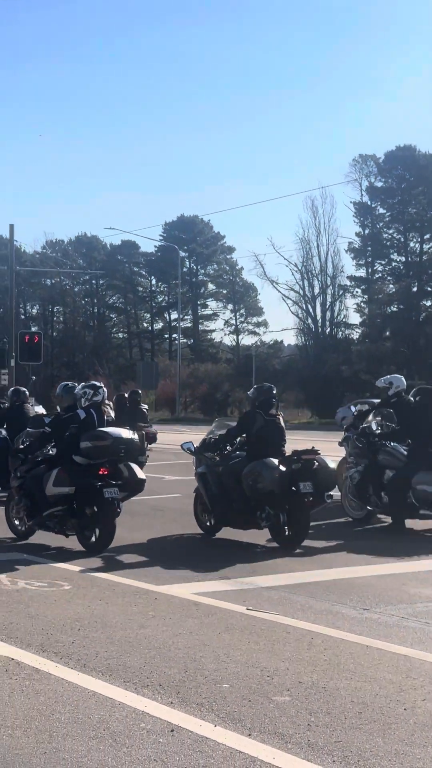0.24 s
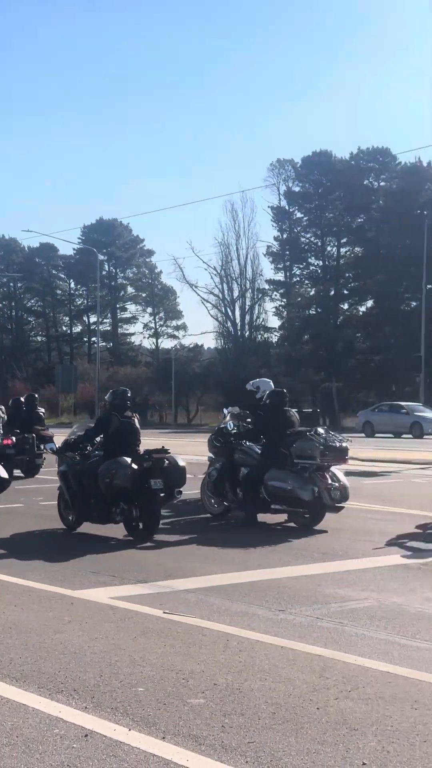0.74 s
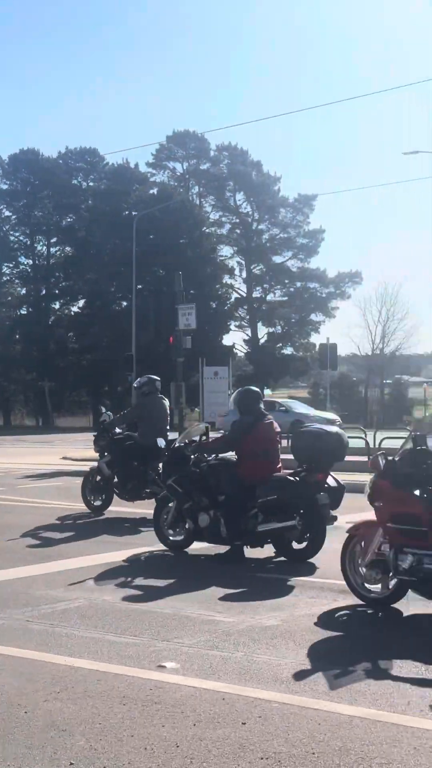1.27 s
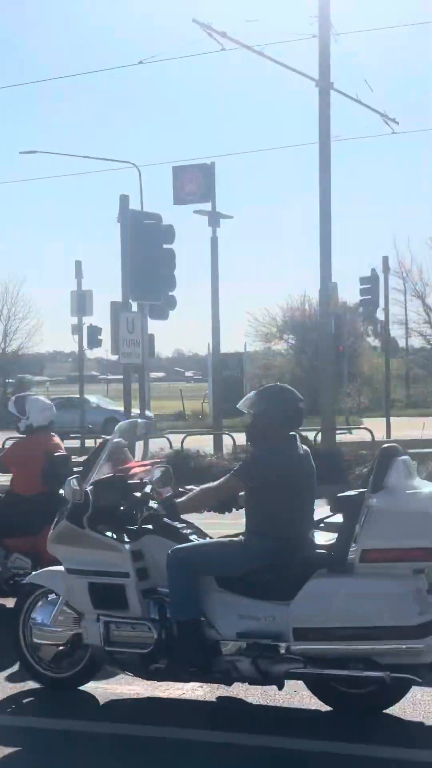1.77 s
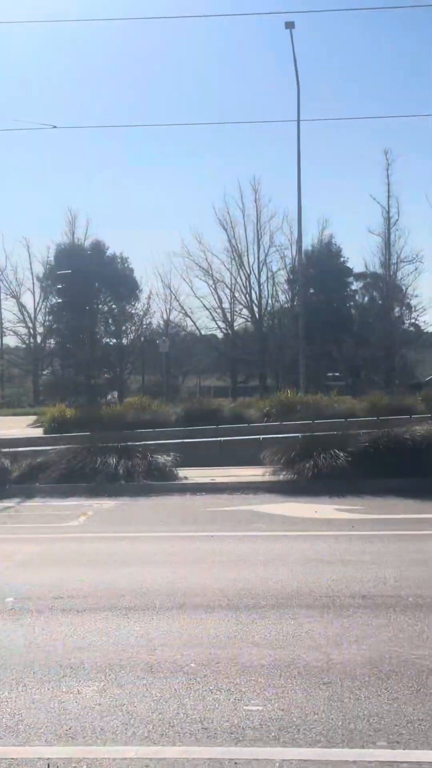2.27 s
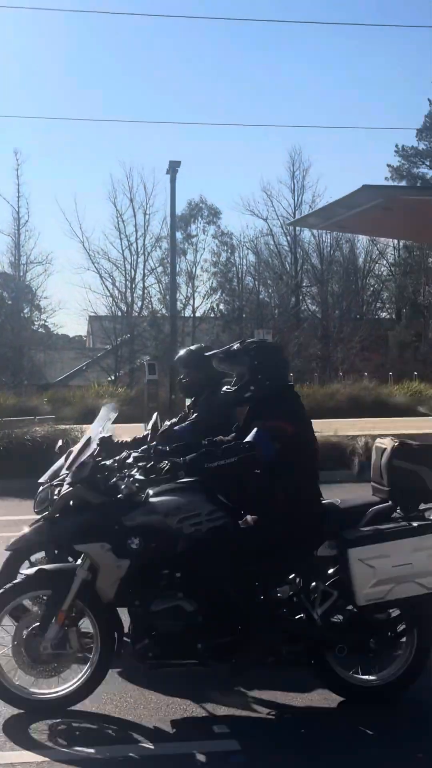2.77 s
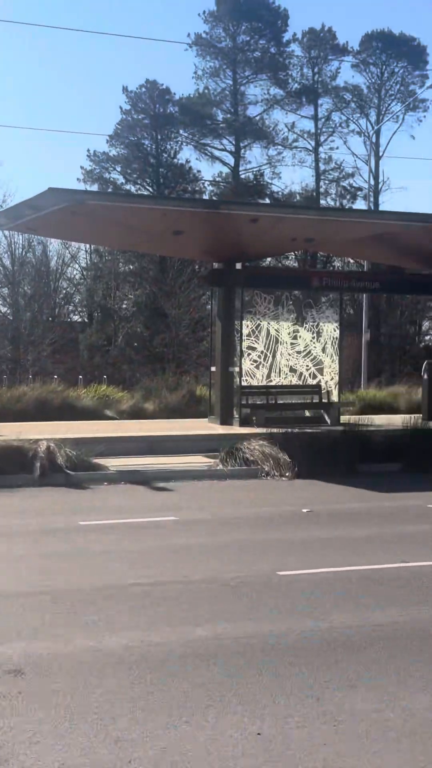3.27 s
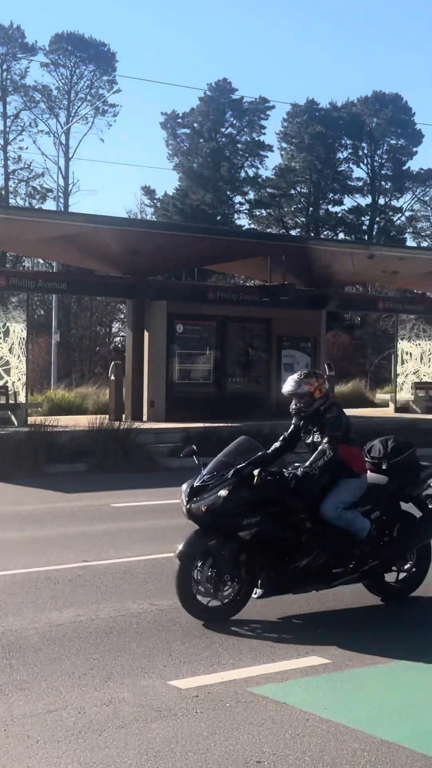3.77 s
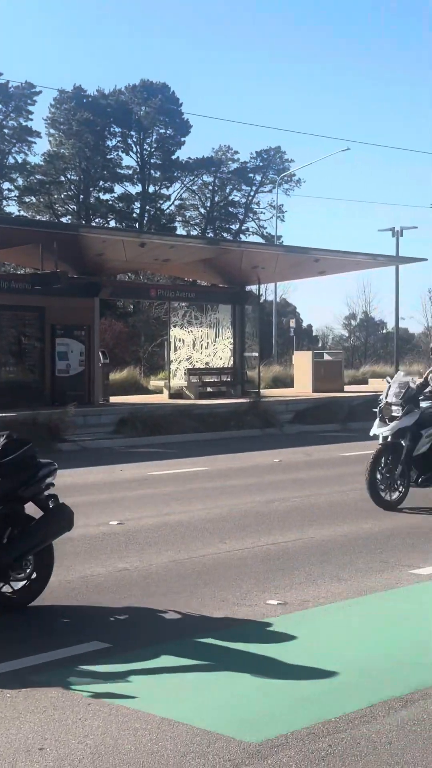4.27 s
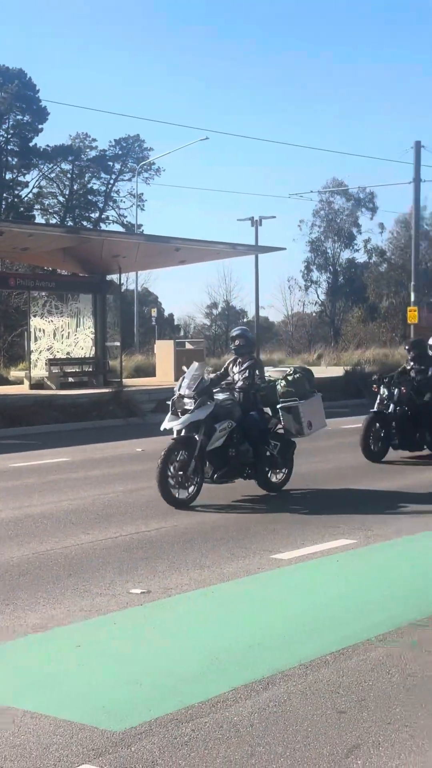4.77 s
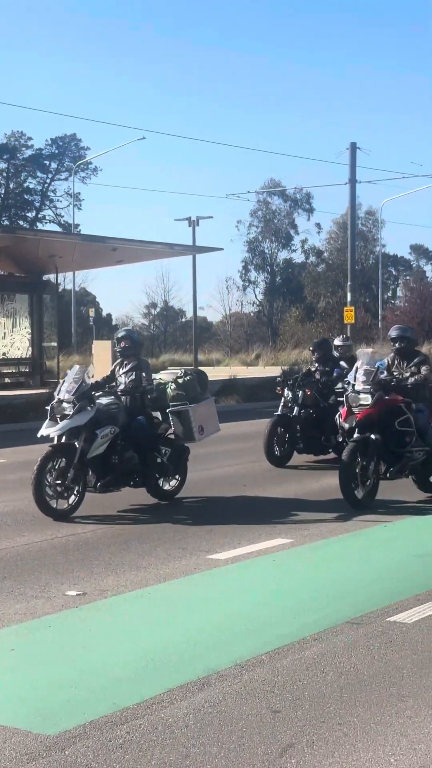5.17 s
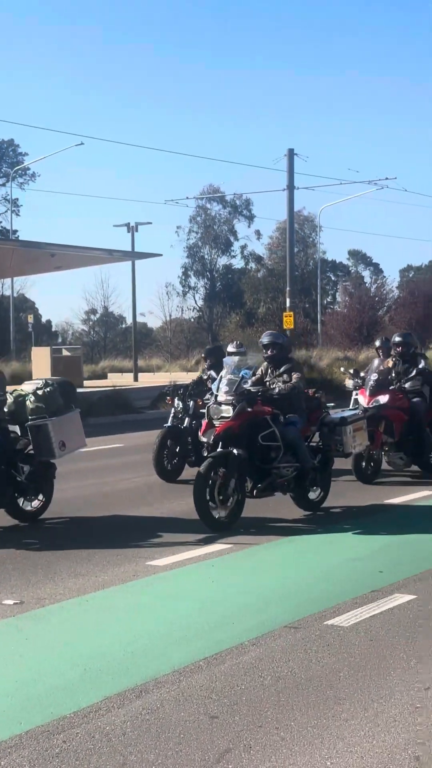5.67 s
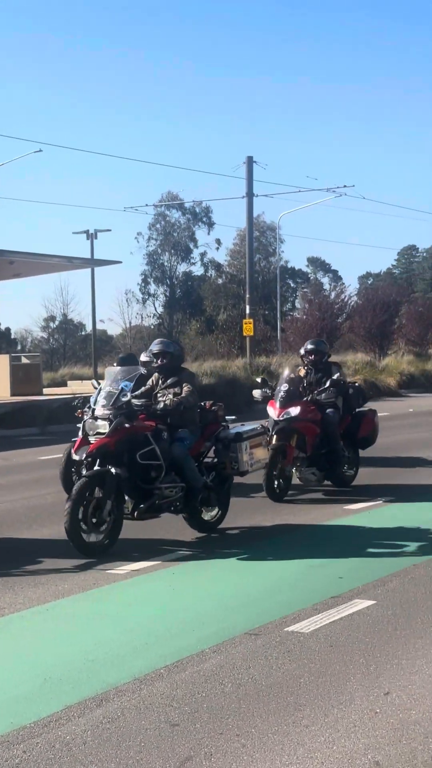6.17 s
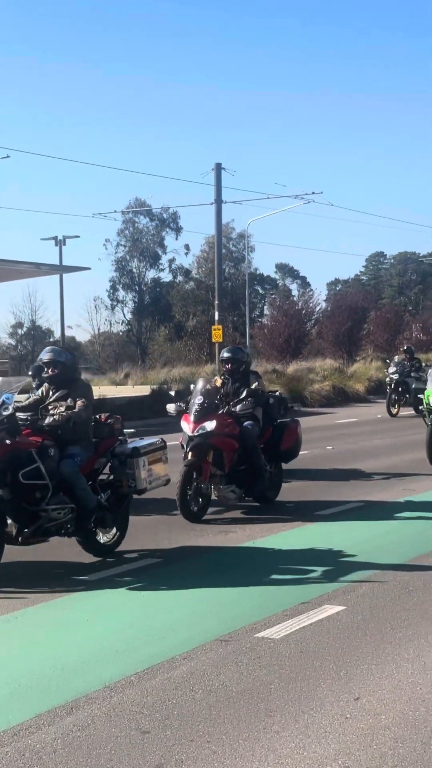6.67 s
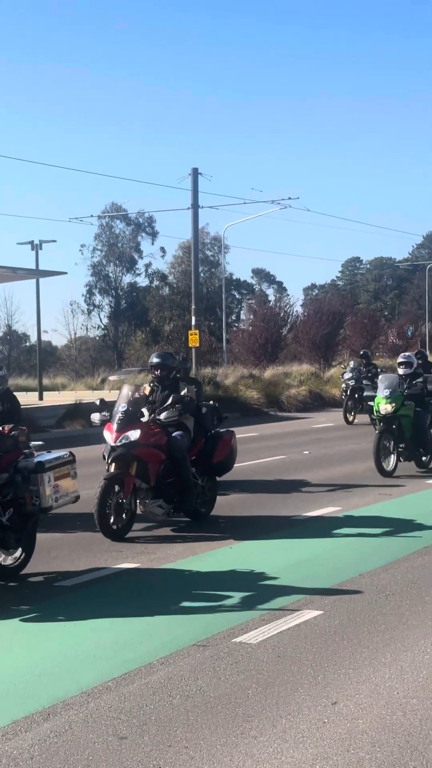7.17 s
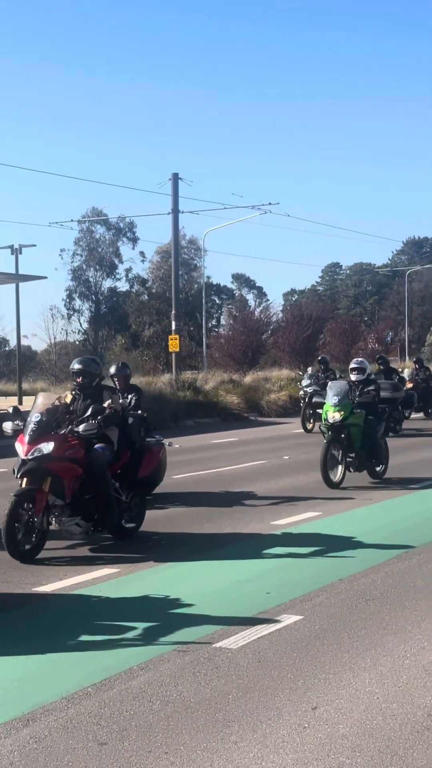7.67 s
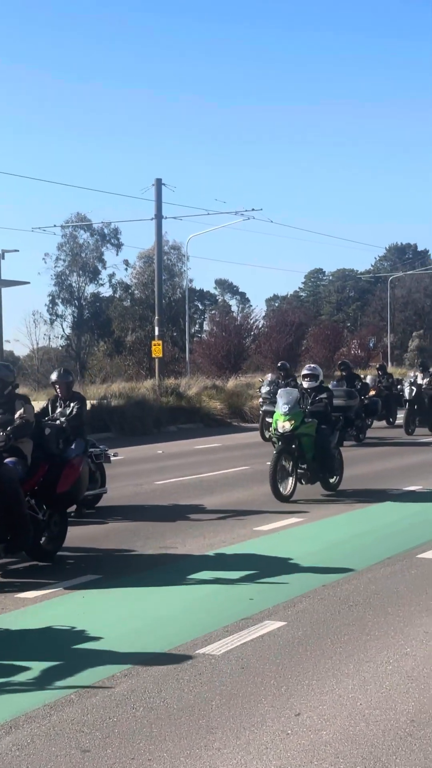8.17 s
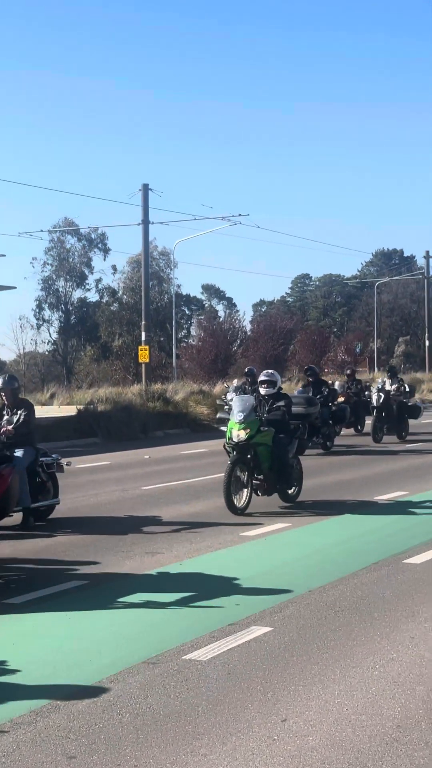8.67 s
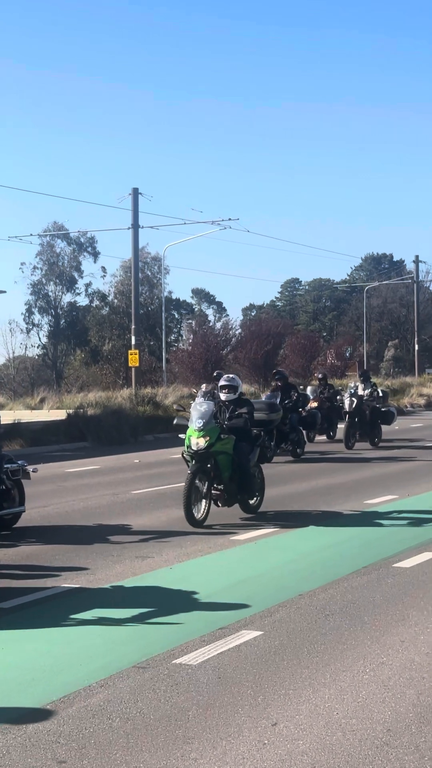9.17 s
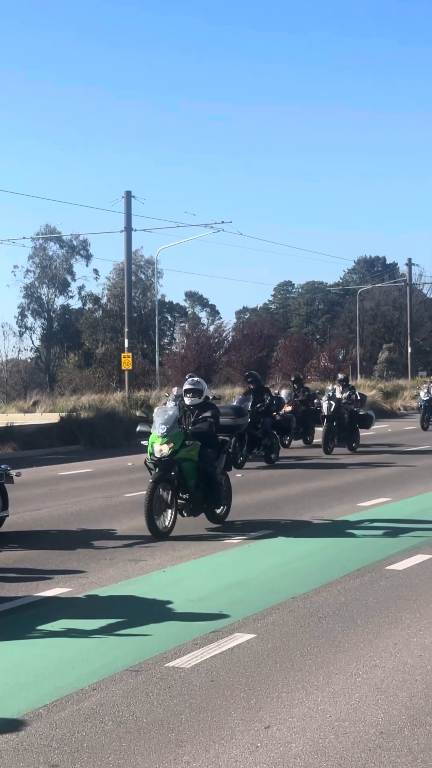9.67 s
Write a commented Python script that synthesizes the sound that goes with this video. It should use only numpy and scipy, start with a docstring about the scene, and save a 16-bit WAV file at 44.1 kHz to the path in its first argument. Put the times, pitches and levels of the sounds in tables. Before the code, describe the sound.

Close roadside sound of a motorcycle procession, already under way. Low engines overlap and waver, with irregular nearby thumps and soft road hiss. Rumbling wind hits the two-port microphone strongly in the first four seconds. Small squeaks and light mechanical ticking come and go; from about five seconds a single distinct engine thuds regularly and grows stronger, with a thin brake whine.

```python
"""At the kerb of a road, a long line of large motorcycles rolls slowly past a microphone with two ports.
Exhausts thump out of step over drifting sine drones; nearer firings are sines that fall in pitch as whoops.
Shaped noise makes tyre hiss, sizzle and a faint airy top; resonators tick for one engine's valve gear.
Brakes squeak and whine as gliding sines, and gusts of wind noise push the two ports opposite ways."""
import sys
import numpy as np
from scipy import signal
from scipy.fft import irfft
from scipy.io import wavfile
from scipy.ndimage import uniform_filter1d

SR = 44100
rng = np.random.default_rng(int(sys.argv[2]) if len(sys.argv) > 2 else 0)


def master(y):
    """Save y as 16-bit WAV."""
    cut = np.clip(np.atleast_2d(y).T, -1, 1)
    pcm = np.round(cut * 32767)  # scale
    wavfile.write(sys.argv[1], SR, pcm.astype(np.int16))


N = 437472  # samples


def gain_of(db):
    """Turns dB into a linear gain."""
    return 10 ** (np.asarray(db) / 20)


def evened(x):
    """Scales a signal to an rms of 1."""
    return x / np.sqrt(np.mean(abs(x) ** 2) + 1e-20)


def smoothed(grid, bins, frames):
    """Averages a spectrogram over neighbouring bins, then over neighbouring frames."""
    return uniform_filter1d(uniform_filter1d(grid, size=bins, axis=0), size=frames, axis=1)


def read(points, hz):
    """Columns of a spectrum table at the frequencies hz, straight lines over log frequency."""
    f, *columns = np.transpose(points)
    return [np.interp(np.log(hz + 1), np.log(f + 1), c) for c in columns]


def follow(rows, t):
    """Columns of a time curve at the times t."""
    s, *columns = np.transpose(rows)
    return [np.interp(t, s, c) for c in columns]


def wander(rate, t):
    """Slow random movement of rms 1: twenty sines of random phase from rate / 20 up to rate in Hz."""
    coarse = np.arange(0, t[-1] + .02, .01)
    turns = np.geomspace(rate / 20, rate, num=20)[:, None] * coarse + rng.random((20, 1))
    movement = evened(np.sin(2 * np.pi * turns).sum(0))
    return np.interp(t, coarse, movement)


def strokes(cycles):
    """One click wherever the count of cycles passes a whole number."""
    return np.diff(np.floor(cycles), prepend=np.floor(cycles[0]))


def patchy(points, level_db, patch_db):
    """Noise of one colour whose level varies in patches; level_db is one value, per frame or bins x frames."""
    hz = np.fft.rfftfreq(512, 1 / SR)
    real, imaginary, patches = rng.standard_normal((N // 128 + 5, 257, 3)).T
    patches = evened(smoothed(patches, 8, 16))
    colour = gain_of(read(points, hz)[0])[:, None]
    colour /= np.linalg.norm(colour)  # only the shape of the table counts
    z = (real + 1j * imaginary) * colour * gain_of(level_db + patch_db * patches)
    return signal.istft(z, nperseg=512, noverlap=384)[1][:N]


# Colour of the faint hiss at the very top. Each row: frequency in Hz, relative density in dB per Hz.
AIRY_COLOUR = [(13600, -41), (14600, -11.5), (15500, 1), (16000, -1.5)]
AIRY_SUM_DB, AIRY_APART_DB = -72.5, -64.5


def airy_top():
    """Very patchy high noise, one part alike at both ports and a stronger part opposite."""
    both, across = (patchy(AIRY_COLOUR, db, patch_db=7.0) for db in (AIRY_SUM_DB, AIRY_APART_DB))
    return np.array([both + across, both - across])


# Gusts at the ports. Each row: start in seconds, hold in seconds, strength in dB.
GUSTS = [(0.0, 1, -37), (0.9, 0.19, -33), (1.13, 0.31, -38), (1.976, .05, -30.5), (2.094, 0.36, -37),
         (2.65, .05, -39), (2.874, 0.18, -31), (3.279, 0.056, -34.5), (3.542, 0.025, -36.5),
         (3.95, .24, -42.5), (4.47, 0.033, -49), (5.07, 0.14, -41), (6.45, 0.033, -41), (7.99, 0.019, -48),
         (8.757, 0.24, -41.5), (9.133, 0.035, -39), (9.343, .02, -48), (9.52, 0.018, -42)]
# The breeze between gusts. Each row: time in seconds, strength in dB.
BREEZE = [(0.0, -45), (2.0, -42.5), (4.2, -48.5), (4.65, -80), (5.9, -58), (7.0, -61.5), (7.6, -80.5),
          (9.0, -59), (9.92, -67)]
GUST_RISE_DB_PER_S, GUST_FALL_DB_PER_S = 261, 222.5


def wind_db(t):
    """Strength of the wind: a breeze, and gusts that rise fast, hold and die away."""
    start, hold, db = np.transpose(GUSTS)[:, :, None]
    rise = GUST_RISE_DB_PER_S * np.maximum(start - t, 0)
    fall = GUST_FALL_DB_PER_S * np.maximum(t - start - hold, 0)
    return np.maximum((db - rise - fall).max(axis=0), follow(BREEZE, t)[0])


# Colour of the wind noise. Each row: frequency in Hz, density against the wind strength in dB per Hz.
WIND_COLOUR = [(18, -41.5), (30, -18), (96, 3.5), (223, 2.5), (427, -15), (612, -17), (1040, -27.5),
               (1320, -46), (1800, -48.5), (2340, -79), (3960, -120)]


def wind_noise(hz, gust_db):
    """Spectrogram of the low rumble of air on the ports: random bins that follow the gusts."""
    real, imaginary = rng.standard_normal((len(gust_db), len(hz), 2)).T
    return gain_of(read(WIND_COLOUR, hz)[0][:, None] + gust_db) * (real + 1j * imaginary)


# Colour of tyres on tarmac. Each row: frequency in Hz, relative density in dB per Hz.
TYRE_COLOUR = [(180, -32), (300, 2), (345, -3), (392, -8.5), (614, -9.5), (797, -12), (969, -8),
               (1150, -11), (1270, -27), (1400, -14.5), (1520, -14), (1830, -34), (2100, -31), (2730, -62),
               (4620, -120)]
# Colour of chains and cooling air. Each row: frequency in Hz, relative density in dB per Hz.
SIZZLE_COLOUR = [(1120, -40), (1900, -18.5), (2230, -7), (2380, -2.5), (2720, -1), (3710, -3), (4730, -7),
                 (5720, -5), (7630, -8.5), (8720, -14.5), (11300, -32.5), (19200, -120)]
# The roll past. Each row: time in seconds, tyre hiss in dB, sizzle in dB,
# brightness in dB (lifts the sizzle's upper half, lowers its lower half).
ROLL = [(0.0, -31.5, -48, 3.5), (0.6, -33, -47, 3), (1.5, -33.5, -46, 4), (2.05, -34, -44.5, 4.5),
        (2.55, -32.5, -42.5, 1.8), (2.8, -32.5, -42, 1), (3.1, -33, -43, 1.8), (3.35, -31, -43, 1.5),
        (3.5, -33, -42.5, 2.5), (3.95, -32, -43, 2.5), (4.56, -33, -43.5, 2.5), (4.95, -31.5, -43, 2),
        (6.3, -32, -42.5, 1.5), (6.9, -30.5, -42, 1.3), (8.0, -31, -41.5, 1), (8.55, -30, -40, 1.5),
        (9.92, -29, -39.5, 1)]
# The hiss flares or sinks in places as bikes pass. Each row: time in seconds, half length in seconds,
# centre in Hz, half width in octaves, change in dB.
FLARES = [(.4, 0.69, 1500, .15, -4.5), (1.904, 0.62, 2300, 0.19, 6), (2.1, 0.068, 1000, .3, 1.5),
          (2.504, 1., 344, .2, 6), (2.806, .03, 3420, 0.092, 5), (3.52, .05, 5630, .1, 5),
          (3.9, 0.07, 950, .15, 4), (4.9, 0.75, 403, 0.28, -1.5), (5.397, 0.36, 1000, 0.18, 3),
          (7.55, 0.069, 990, .12, 0.5), (8.1, .5, 950, .2, 2.5), (8.672, 0.031, 690, .06, 8),
          (8.822, 0.029, 630, 0.062, 8), (9.1, .05, 1000, 0.11, 6.5)]


def hiss(t, puffs):
    """Tyre hiss and a brighter sizzle swell apart; both flutter with the firings."""
    s, hz = np.arange(N // 128 + 5) * 128 / SR, np.fft.rfftfreq(512, 1 / SR)[:, None]
    tyre_db, sizzle_db, bright_db = follow(ROLL, s)
    upper = np.clip((hz - 4000) / 1500, -1, 1)
    flare_db = 0
    for at, half, centre_hz, octaves, db in FLARES:
        distance = ((s - at) / half) ** 2 + (np.log2((hz + 1) / centre_hz) / octaves) ** 2
        flare_db = flare_db + db * np.exp(-distance)
    tyres = patchy(TYRE_COLOUR, tyre_db + flare_db, patch_db=1.0)
    sizzle = patchy(SIZZLE_COLOUR, sizzle_db + upper * bright_db + flare_db, patch_db=0.72)
    return tyres * (1 + 0.07 * (puffs - 1)) + sizzle * (1 + 0.3 * (puffs - 1))


# Valve gear of the nearest engine. Each row: time in seconds, cycles per second, ticking level in dB.
VALVES = [(0, 8.9, -67), (1.4, 9.4, -57), (2.0, 9.1, -53.5), (2.35, 7.9, -61), (2.5, 10, -54),
          (2.9, 8.5, -62), (3.05, 10.6, -56), (3.25, 9.9, -53), (3.6, 9.74, -48), (4.0, 9.1, -59),
          (4.6, 9.9, -55.5), (5.1, 10.6, -60.5), (9.92, 10.5, -64.5)]
# Rings of the engine cover. Each row: pitch in Hz, width in Hz, drive from the tick in dB, from the clatter in dB.
COVER_RINGS = [(3350, 2200, -11.5, -5), (5900, 910, -6, 2.5), (6900, 480, -2.5, -9.5)]


def valves(t):
    """A sharp tick and a looser clatter in each cycle ring the engine cover."""
    rate, db = follow(VALVES, t)
    cycles = np.cumsum(rate) / SR
    cycles -= np.interp(3.248, t, cycles)  # a tick falls at this second
    size, grit = gain_of(0.5 * rng.standard_normal(N)), rng.standard_normal(N)
    tick_decay = np.exp(-1 / (0.0022 * SR))
    sharp = grit * signal.lfilter([1], [1, -tick_decay], strokes(cycles) * size)
    loose = grit * signal.oaconvolve(strokes(cycles - .52) * size, np.hanning(800))[:N] * 0.35
    ring, k = np.zeros(N), np.arange(300) / SR
    for hz, width, tick_db, clatter_db in COVER_RINGS:
        mode = np.exp(-np.pi * width * k) * np.sin(2 * np.pi * hz * k)
        drive = gain_of(tick_db) * sharp + gain_of(clatter_db) * loose
        ring += signal.oaconvolve(drive, mode)[:N]
    return gain_of(db) * evened(ring)


# Brake squeaks and short hoots, each one glide. Each row: start in seconds, length in seconds,
# first pitch in Hz, last pitch in Hz, level in dB.
SQUEAKS = [(2.1, 0.091, 994, 1000, -39), (3.08, .045, 13600, 13500, -71), (3.22, 0.077, 13780, 13520, -50),
           (3.85, 0.081, 903, 914, -44), (3.92, 0.055, 900, 1060, -30), (4.03, 0.12, 13700, 13600, -59),
           (4.365, 0.11, 13830, 14000, -54), (5.485, .075, 7900, 7200, -42), (7.68, 0.15, 2200, 2010, -55),
           (8.06, 0.073, 662, 668, -33), (8.508, 0.078, 692, 670, -32), (8.745, 0.075, 700, 650, -32.5)]
SQUEAK_RISE_S, SQUEAK_FALL_S = 0.022, 0.051


def squeaks():
    """Each a sine gliding from its first pitch to its last, with soft ends."""
    out = np.zeros(N)
    for start, length, first_hz, last_hz, db in SQUEAKS:
        k = np.arange(0, length, 1 / SR)
        ends = np.clip(np.minimum(k / SQUEAK_RISE_S, (length - k) / SQUEAK_FALL_S), 0, 1)
        turns = np.cumsum(first_hz + (last_hz - first_hz) * k / length) / SR + rng.random()
        squeak = np.sqrt(2) * gain_of(db) * ends * np.sin(2 * np.pi * turns)
        out[round(start * SR):][:len(k)] += squeak
    return out


# A thin brake whine that bends up as it ends. Each row: time in seconds, pitch in Hz, level in dB.
WHINE = [(6.53, 3150, -75), (6.59, 3150, -53), (6.635, 3150, -62), (6.69, 3150, -55), (6.85, 3165, -52),
         (6.92, 3160, -59), (7.0, 3150, -54), (7.09, 3150, -59), (7.18, 3170, -53), (7.24, 3235, -51),
         (7.27, 3250, -73)]


def whine(t):
    """One sine that follows the pitch and level of its curve."""
    hz, db = follow(WHINE, t)
    sounding = (t > WHINE[0][0]) & (t < WHINE[-1][0])
    turns = np.cumsum(hz) / SR + rng.random()
    return np.sqrt(2) * sounding * gain_of(db) * np.sin(2 * np.pi * turns)


# Strongest exhaust tones, low to high. Each row: mean pitch in Hz, level against the drone in dB.
DRONES = [(52, -10.5), (60.5, -2.5), (69, -3), (76, -3), (85, -2), (95, -2), (107, -2), (116, -1.5),
          (131, -5), (145, -7.5), (160, -4.5), (186, -10), (218, -9.5)]
# Tones of whichever bikes are nearest stand out. Each row: time in seconds, loudest pitch in Hz, drone level in dB.
NEAREST = [(0.0, 72.5, -20.5), (1.1, 77.5, -20), (2.0, 69.6, -22), (2.6, 78, -20), (3.3, 75, -20.5),
           (3.9, 94, -17.5), (4.6, 87, -21.5), (5.1, 68, -17), (5.7, 79.5, -17.5), (6.5, 80, -16.5),
           (7.3, 79.64, -18.5), (8.1, 84.3, -21), (8.8, 79.95, -20.5), (9.92, 81.4, -18)]
DRIFT, DRIFTS_PER_S = 0.045, 2.2  # farthest slide as throttles move (share of pitch)
SWELL_DB, SWELLS_PER_S = 4.5, 5.0  # farthest swell or sink as bikes beat against each other
AWAY_DB_PER_OCTAVE = 4  # tones sink with their distance from the loudest pitch


def drones(t):
    """Sines near fixed pitches that slide and swell by chance, strongest around the loudest pitch."""
    loudest_hz, level_db = follow(NEAREST, t)
    out = np.zeros(N)
    for hz, db in DRONES:
        sliding_hz = hz * (1 + DRIFT * np.tanh(wander(DRIFTS_PER_S, t)))
        turns = np.cumsum(sliding_hz) / SR + rng.random()
        away_db = AWAY_DB_PER_OCTAVE * abs(np.log2(hz / loudest_hz))
        swell_db = SWELL_DB * np.tanh(wander(SWELLS_PER_S, t))
        out += gain_of(db - away_db + swell_db) * np.sin(2 * np.pi * turns)
    return gain_of(level_db) * out


# Each firing falls from the top pitch to the pipe's ring while it swells, then dies away.
WHOOP_TOP_HZ, RING_HZ, DROP_S, SWELL_S = 590, 72, .0041, .005


def causal(points):
    """Minimum-phase response of the given spectrum, its lows delayed as in the falling whoop."""
    hz = np.fft.rfftfreq(16384, 1 / SR)
    db = read(points, hz)[0]
    log_gain = np.log(gain_of(np.concatenate([db, db[-2:0:-1]])))
    late_s = DROP_S * np.log(np.maximum(WHOOP_TOP_HZ / np.maximum(hz, RING_HZ), 1))
    prompt = np.exp(log_gain - 1j * signal.hilbert(log_gain).imag)[:len(hz)]
    return irfft(prompt * np.exp(-2j * np.pi * np.cumsum(late_s) * hz[1]))[:8192]


# Twins in the pack. Each row: four-stroke cycles per second, place of the second firing in the cycle (0-1),
# relative level in dB.
ENGINES = [(9.7, 0.6, -5.5), (9.1, .44, -3), (12.7, .56, -2), (8.3, .44, -0.5), (15.4, 0.4, -3.5),
           (10.6, 0.3, -0.5), (16.4, .63, -3), (13.9, .44, -5), (8.3, .56, -1)]
# Colour of a thump through the pipe. Each row: frequency in Hz, relative gain in dB.
PIPE = [(25, -31), (45, -7.5), (60, -3), (100, -9.5), (140, -4), (200, -9), (300, -17.5), (420, -30.5),
        (700, -33), (1500, -66)]
# Exhaust thumps of the whole pack. Each row: time in seconds, level in dB.
PACK = [(0.0, -18), (0.6, -19), (1.1, -16.5), (2.0, -16.5), (2.9, -18.5), (3.5, -21), (4.2, -20),
        (4.9, -20.5), (5.4, -20), (6.3, -22), (7.1, -19.5), (8.1, -21), (8.7, -18.5), (9.4, -17),
        (9.92, -18)]


def exhausts(t):
    """Each twin fires twice a cycle with uneven strength; speeds drift and bikes come and go."""
    fired = np.zeros(N)
    for rate, second, db in ENGINES:
        cycles = np.cumsum(rate * (1 + .012 * wander(.8, t))) / SR + rng.random()
        blows = strokes(cycles) + 0.75 * strokes(cycles - second)
        fired += blows * gain_of(db + 2.0 * wander(0.793, t) + 1.6 * rng.standard_normal(N))
    thumps = signal.oaconvolve(fired, causal(PIPE))[:N]
    # evened out so that the pack curve alone sets the slow level
    steady = thumps / np.sqrt(uniform_filter1d(thumps ** 2, size=13000) + 1e-12)
    puffs = signal.lfilter([1], [1, -np.exp(-1 / (0.012 * SR))], fired)  # gas rushing out after each firing
    puffs = uniform_filter1d(puffs, size=130)
    return gain_of(follow(PACK, t)[0]) * steady, puffs / puffs.mean()


# One loud single-cylinder engine draws near. Each row: time in seconds, firings per second.
SINGLE = [(5.2, 13.65), (5.7, 13.0), (6.1, 12.27), (6.4, 13.56), (6.7, 13.83), (7.0, 12.75), (7.3, 12.07),
          (7.7, 12.14), (8.1, 12.16), (8.4, 11.42), (8.7, 12.02), (9.1, 11.32), (9.5, 12.11), (9.92, 11.4)]
# Its strength. Each row: time in seconds, blow of a firing in dB.
SINGLE_DB = [(5.2, -16), (5.6, -12), (6.2, -11.5), (6.8, -9.5), (7.3, -10), (7.7, -9), (8.2, -10),
             (8.6, -8.5), (9.0, -9.5), (9.4, -9), (9.92, -8.5)]
# Firings of other near bikes that stand out of the pack. Each row: time in seconds, blow in dB.
POPS = [(0.176, -11), (0.28, -13), (0.393, -14), (0.505, -21), (0.593, -18), (0.66, -17), (0.728, -20),
        (0.838, -16), (1.17, -19), (1.247, -15.5), (1.366, -26.5), (1.47, -21), (1.588, -25),
        (1.677, -26.5), (1.736, -13), (2.015, -24), (2.185, -13.5), (2.39, -22), (2.806, -24.5),
        (2.862, -10), (3.005, -21.5), (3.088, -8.5), (3.206, -26), (3.414, -14), (3.499, -12.5),
        (3.899, -23), (4.03, -16), (4.213, -10), (4.287, -30), (4.446, -10), (4.588, -18), (4.795, -16),
        (4.97, -10), (5.229, -15.5), (5.839, -14), (5.917, -21), (6.057, -14.5), (6.392, -11.5),
        (6.742, -19), (6.821, -19.5), (6.904, -10), (7.039, -10), (7.562, -20), (7.897, -15), (8.279, -17),
        (8.385, -16), (9.243, -17), (9.331, -25), (9.401, -13)]
FIRST_S = 5.261  # the single's first firing
PUNCH_T60_S, RING_T60_S, RING_SHARE = .075, .3, .26  # the punch dies fast over a weaker ring
OVERTONE_HZ, OVERTONE_DB, OVERTONE_T60_S = 156, -8, .17  # the pipe's second ring
LEAD_S = .0055  # the whoop starts just ahead of its thump


def near_pipes(t):
    """Distinct firings close by, each the same falling whoop with a second ring of the pipe."""
    cycles = np.cumsum(follow(SINGLE, t)[0]) / SR
    cycles -= np.interp(FIRST_S, t, cycles)
    blow_db = follow(SINGLE_DB, t)[0] + 1.3 * rng.standard_normal(N)
    blows = strokes(cycles) * (cycles >= 0) * gain_of(blow_db)
    s, pop_db = np.transpose(POPS)
    blows[np.round(s * SR).astype(int)] = gain_of(pop_db)
    k = np.arange(SR // 3) / SR
    turns = np.cumsum(RING_HZ + (WHOOP_TOP_HZ - RING_HZ) * np.exp(-k / DROP_S)) / SR
    fading = gain_of(-60 * k / PUNCH_T60_S) + RING_SHARE * gain_of(-60 * k / RING_T60_S)
    whoop = -np.sin(2 * np.pi * turns) * (1 - np.exp(-k / SWELL_S)) ** 1.6 * fading
    overtone = gain_of(OVERTONE_DB - 60 * k / OVERTONE_T60_S) * np.sin(2 * np.pi * OVERTONE_HZ * k)
    overtone *= 1 - np.exp(-k / 0.015)
    firing = whoop / whoop.max() + overtone
    return signal.oaconvolve(blows, firing)[round(LEAD_S * SR):][:N]


def scene():
    """The whole pack from the roadside, dulled above 9700 Hz; squeaks and whine skip the dulling."""
    t = np.arange(N) / SR
    thumps, puffs = exhausts(t)
    road = drones(t) + thumps + near_pipes(t) + hiss(t, puffs) + valves(t)
    dulled = signal.sosfilt(signal.butter(12, 9700, fs=SR, output="sos"), road)
    road = dulled + squeaks() + whine(t)
    return np.array([road, road])


# The ports in calm air. Each row: frequency in Hz, difference against sum in dB,
# share of the difference that is a plain time lag (-1 to 1).
PORTS = [(80, -60, 0), (170, -49.5, 0), (254, -23, .3), (364, -5.5, 0.046), (960, -4.5, 0.36),
         (1310, -4, .3), (1690, -5.5, .3), (1960, -41, 0), (5100, -56, 0), (5800, -5, -.4),
         (6550, -4, -.65), (7460, 0.5, -.65), (8400, 7, -.55), (12000, 7, -.6), (13000, 5, -.6)]


def port_difference(hz, z, calm_db):
    """What sets the ports apart: a quarter-turn copy of the sound for lag, and noise of its local level."""
    lag = np.clip(read(PORTS, hz)[1][:, None], -1, 1)
    real, imaginary = rng.standard_normal((z.shape[1], len(hz), 2)).T
    around = np.sqrt(abs(smoothed(abs(z) ** 2, 3, 9)) / 2)
    scattered = np.sqrt(1 - lag ** 2) * around * (real + 1j * imaginary)
    return gain_of(calm_db) * (1j * lag * z + scattered)


# Loss in strong wind. Each row: frequency in Hz, dB lost per dB of wind above STRONG_WIND_DB.
THINNED = [(200, 0), (330, 0.2), (420, 1.2), (500, 1.5), (600, 1.3), (700, 0.3), (850, 0)]
STRONG_WIND_DB = -44


def thinned(hz, z, gust_db):
    """The low middle thins out raggedly in gusts."""
    chance = rng.standard_normal((len(gust_db), len(hz))).T
    ragged = np.maximum(1 + 0.49 * evened(smoothed(chance, 3, 5)), 0)
    excess_db = np.maximum(gust_db - STRONG_WIND_DB, 0)
    return z * gain_of(-read(THINNED, hz)[0][:, None] * excess_db * ragged)


EDGE_HZ = 15780  # upper band limit


def record(dry):
    """Ports share sound by sum and difference, wind splits them; then low cut, soft clip, band limit."""
    hz, t, z = signal.stft(dry.mean(0), SR, nperseg=1024, noverlap=768)
    calm_db, gust_db = read(PORTS, hz)[0][:, None], wind_db(t)
    apart = port_difference(hz, z, calm_db)
    shared = thinned(hz, z, gust_db)
    wind = wind_noise(hz, gust_db)
    loss = np.sqrt(1 + gain_of(calm_db) ** 2)  # offsets the power that the difference adds
    pair = np.array([(shared + apart) / loss + wind, (shared - apart) / loss - wind])
    ports = signal.istft(pair, nperseg=1024, noverlap=768)[1][:, :N] + airy_top()
    ports = signal.sosfilt(signal.butter(3, 28., "high", fs=SR, output="sos"), ports)
    clipped = 1.454 * np.tanh(ports / 1.561)
    band = signal.firwin(511, EDGE_HZ, window=("kaiser", 9), fs=SR)
    return signal.oaconvolve(clipped, band[None], "same")


dry = scene()
out = record(dry)
master(out)
```